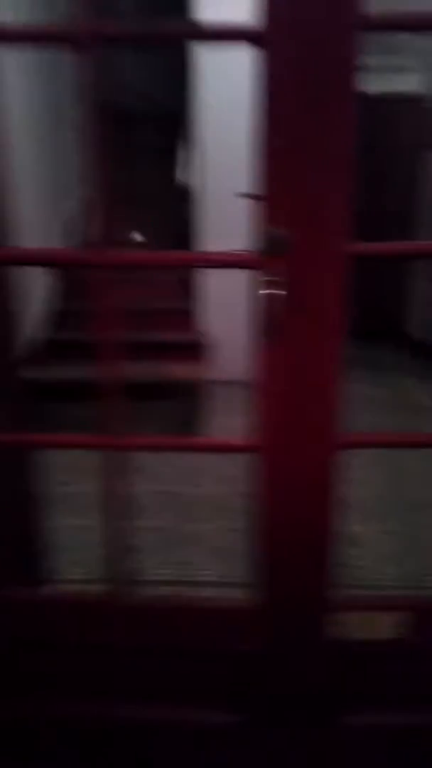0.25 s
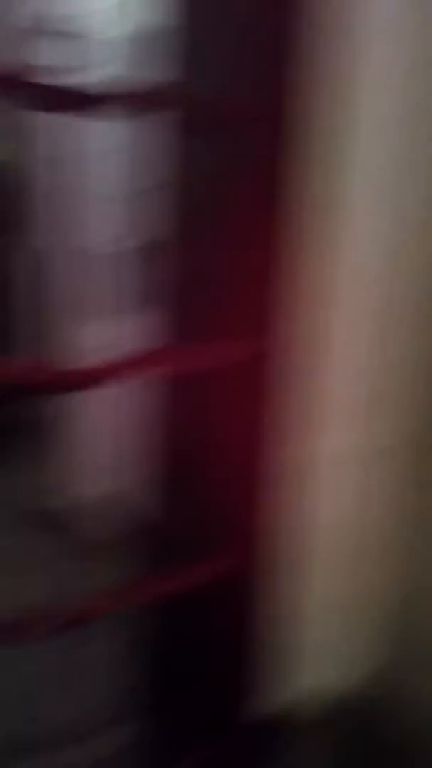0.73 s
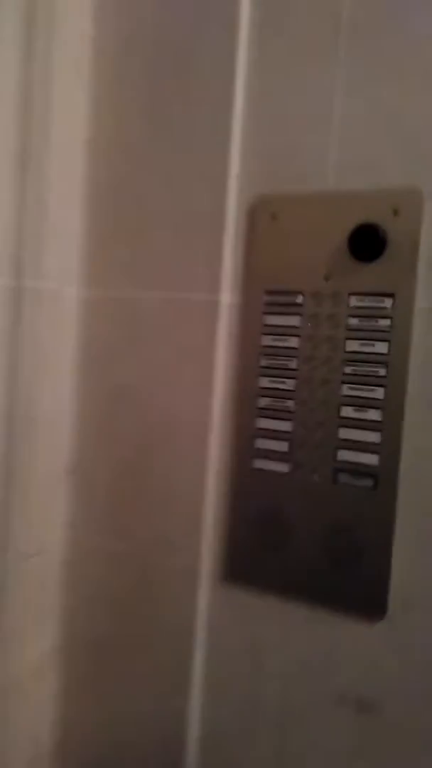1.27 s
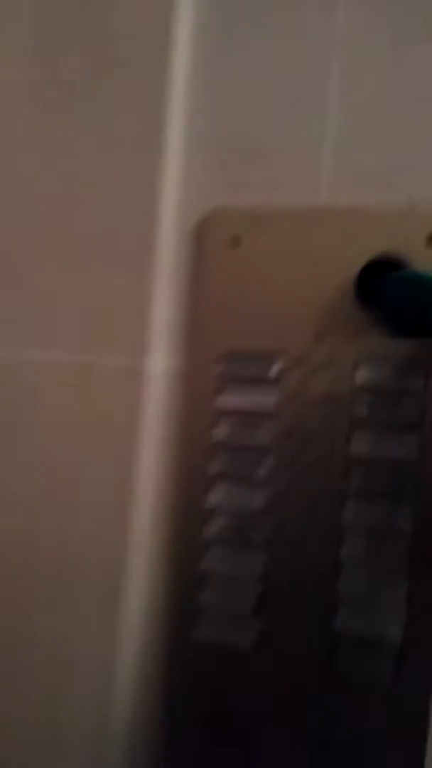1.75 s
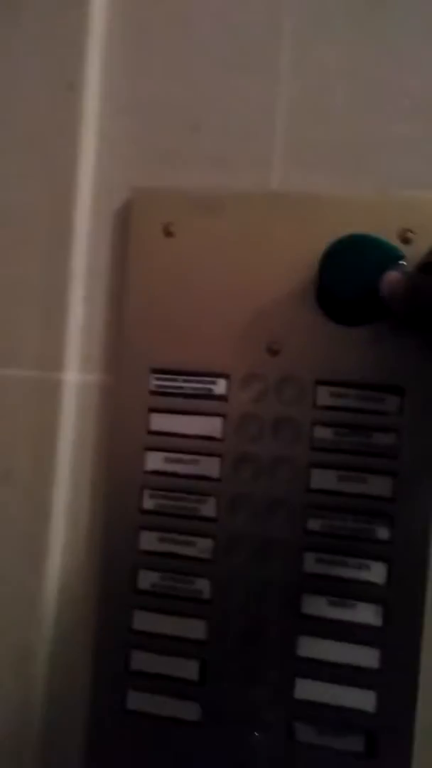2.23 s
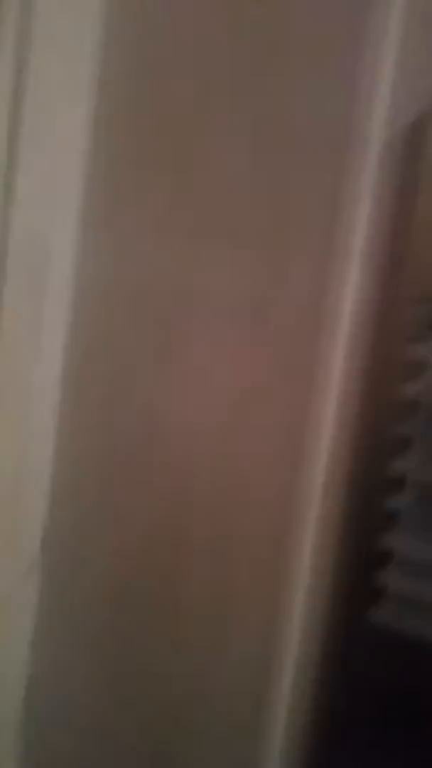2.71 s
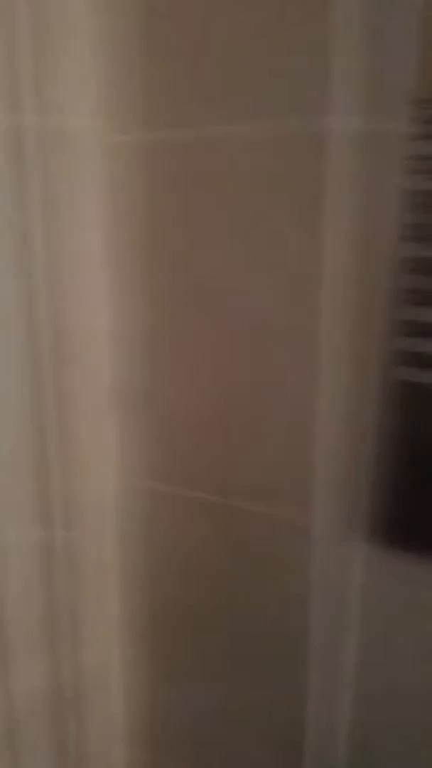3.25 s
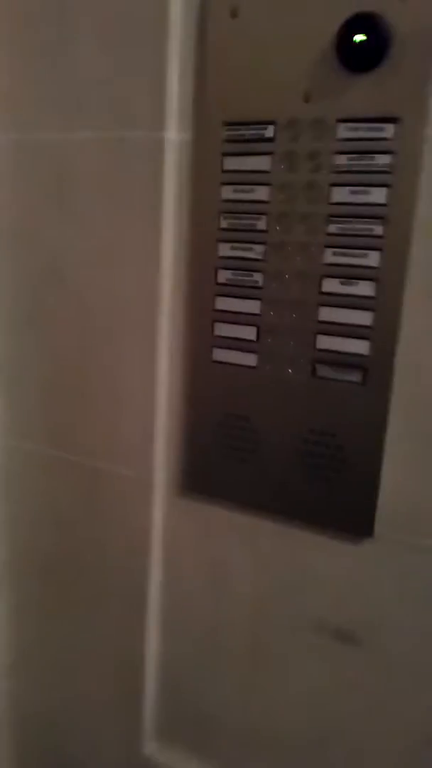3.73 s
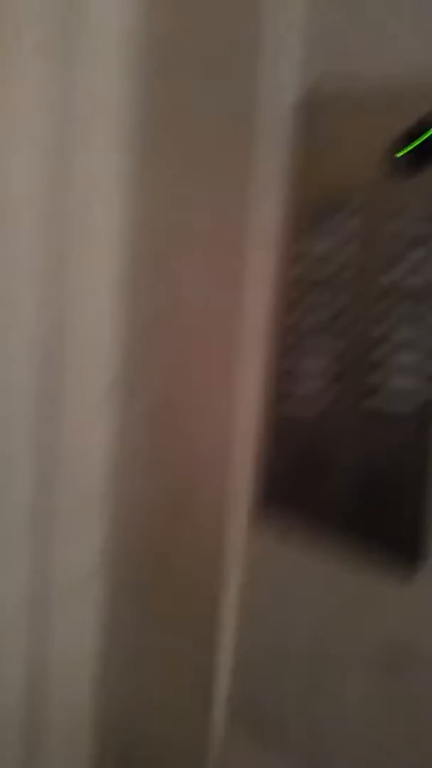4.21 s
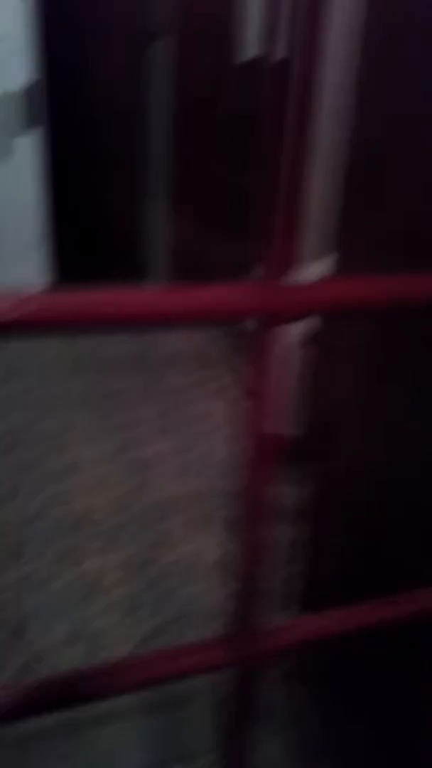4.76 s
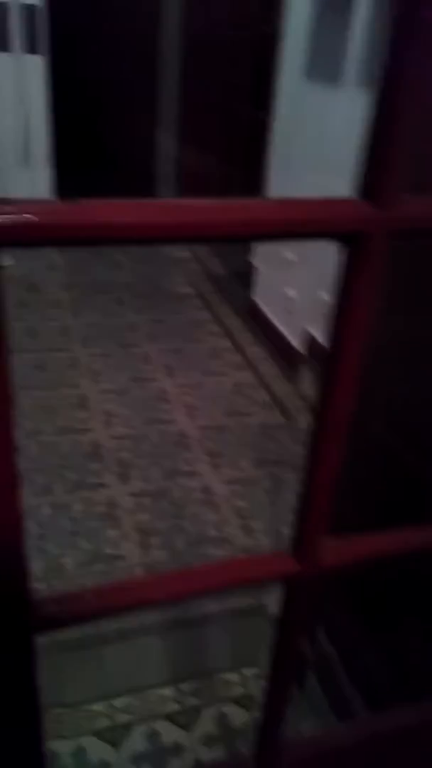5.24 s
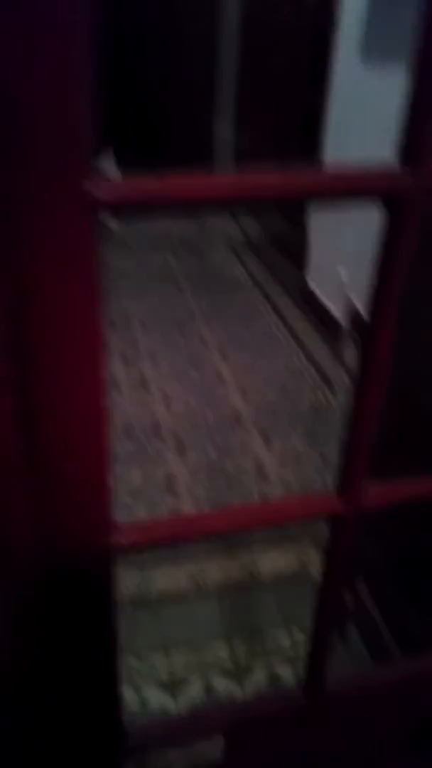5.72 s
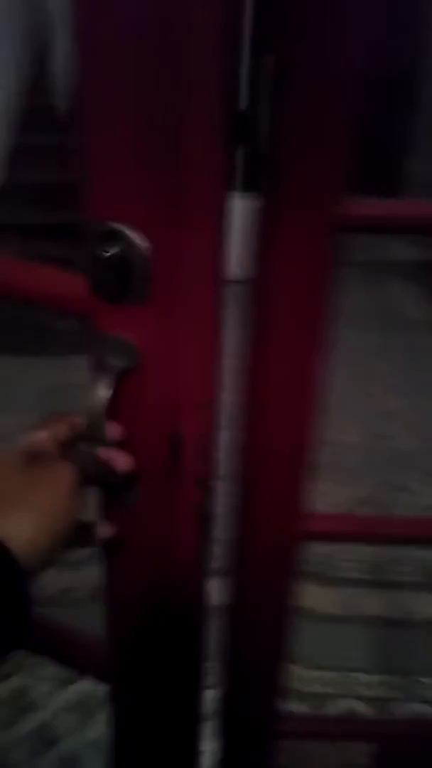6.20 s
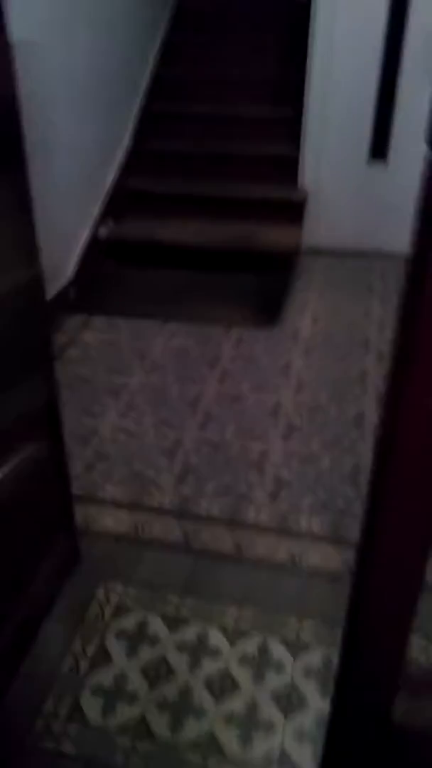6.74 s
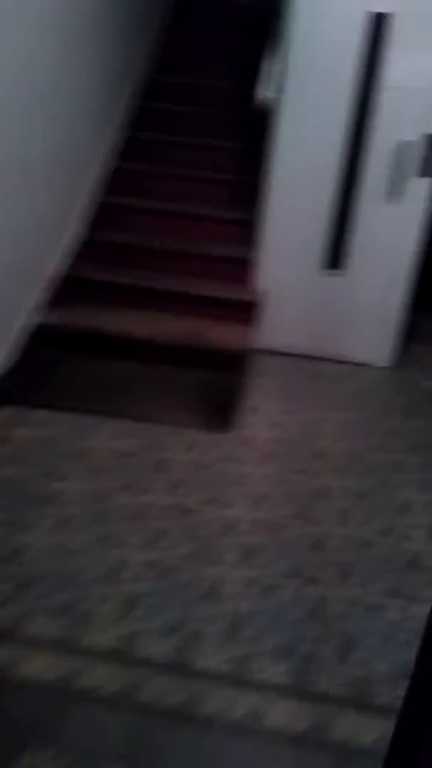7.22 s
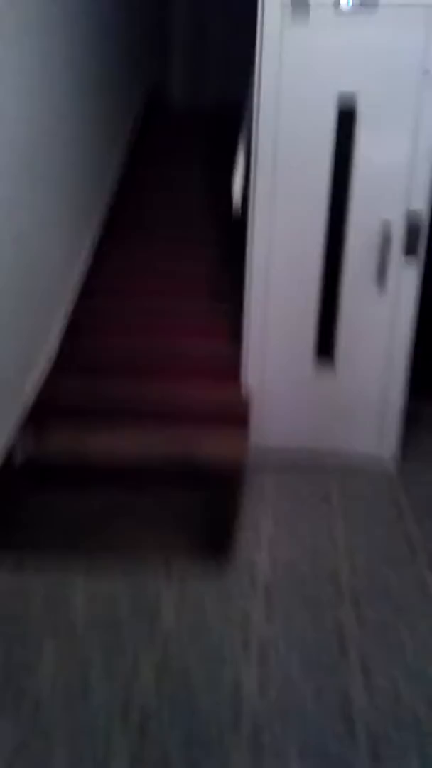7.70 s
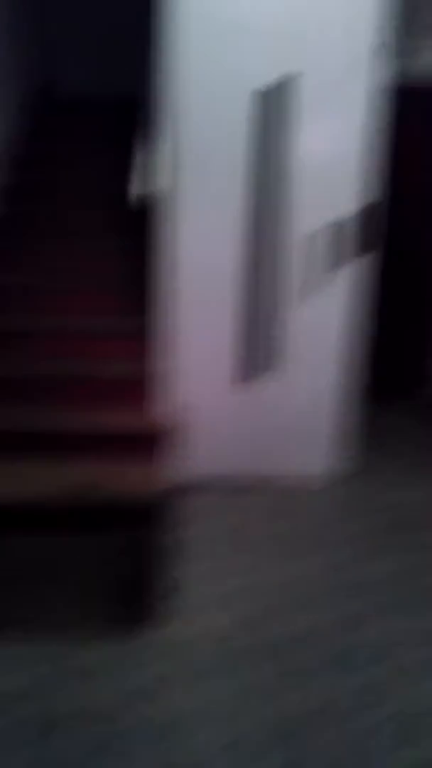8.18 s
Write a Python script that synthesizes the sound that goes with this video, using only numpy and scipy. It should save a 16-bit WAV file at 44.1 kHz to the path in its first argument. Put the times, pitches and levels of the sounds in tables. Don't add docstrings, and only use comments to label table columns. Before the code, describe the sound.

Key ticks, a lock knock and rough handling noise over fading traffic, then one huge, overloading door slam echoes and a latch clicks.

```python
import sys
import numpy as np
from scipy import signal
from scipy.fft import rfft, irfft, next_fast_len
from scipy.io import wavfile
from scipy.ndimage import uniform_filter1d

SR = 44100
rng = np.random.default_rng(int(sys.argv[2]) if len(sys.argv) > 2 else 0)


def wrap_up_sound(samples):
    columns = np.atleast_2d(samples).T
    tamed = np.clip(columns, -1, 1)
    steps = np.round(tamed * 32767).astype(np.int16)
    wavfile.write(sys.argv[1], SR, steps)


def field_ratio(decibels):
    return 10 ** (np.asarray(decibels, dtype=float) / 20)


N = 373086
TIME = np.arange(N) / SR
SIZE = next_fast_len(N + 2 * SR)
HZ = np.arange(SIZE // 2 + 1) * SR / SIZE + 1e-3

# [t/s, peak level/dB, left minus right/dB, hall share/dB]
DOOR_BLOWS = [
    (5.428, -11.5, 3.7, -4.5),
    (5.441, -20.5, 3.7, -5),
    (5.558, -8, 3.7, -2),
    (5.5645, 8, 2.2, -0.5),
    (5.570, -1, 2.2, -5.5),
]
HANDLE_BLOWS = [
    (5.359, -24, 2, -2.5),
    (5.364, -23, 1.85, -2),
    (5.383, -23.5, 3.8, -4),
    (5.396, -28.5, 3.8, -5),
    (5.4172, -17, 4.6, -7.5),
]
LATCH_BLOWS = [
    (7.0566, -13, 7.2, -0.5),
    (7.0605, -14, 7.2, -2.5),
]
BOLT_BLOWS = [
    (2.059, -20.5, 2.5, -6),
    (2.071, -2, 5.2, -6.5),
]
KEY_BLOWS = [(0.0403, -18.5, 22, -11), (0.0644, -21, 21, -18), (0.1072, -3.5, 21, -9.5),
             (0.157, -15, 17.5, -0.5), (0.4334, -16, 13.5, -11), (0.6065, -33, 9.5, -20),
             (0.6255, -16.5, 14, -16.5), (0.7038, -25, 14, -12), (2.4486, -33.5, 12.5, -5.5),
             (2.5441, -20.5, 7, -22.5), (2.566, -21, 15, -14.5), (2.5854, -24, 12.5, -11.5),
             (2.631, -13, 15.5, -8.5)]
# [f/Hz, level per Hz/dB]
DOOR_TONE = [(76, -33), (130, -13), (217, -9.5), (264, -21), (310, -9.5), (497, -7), (783, -6), (1550, 0.5),
             (2770, 4), (4530, -6), (6300, -7.5), (10400, -0.5), (14500, -18.5)]
HANDLE_TONE = [(120, -14.5), (560, -3.5), (900, -7), (1300, -0.5), (1700, -8), (2500, -5.5), (4500, -9.5),
               (10400, -7.5), (14500, -25.5)]
LATCH_TONE = [(180, -41.5), (300, -37), (383, -15), (465, -12.5), (807, -19), (1050, -7.5), (1450, -12),
              (2050, -3), (3050, -14), (6340, -13.5), (10100, -3.5), (14500, -10.5)]
BOLT_TONE = [(150, -49.5), (340, -9), (440, -7.5), (530, -3.5), (835, -20), (1210, -7.5), (1340, -16.5),
             (2700, -10), (4570, -27), (5410, -18), (7350, -24.5), (10100, -17.5), (14500, -40)]
KEY_TONE = [(1880, -54), (3200, -26.5), (4310, -12.5), (4770, -19.5), (5170, -11), (7000, -10), (9430, 2),
            (14500, -8.5)]
# [f/Hz,
# level/dB, t60/s]
DOOR_RING = [(310.4, -27.5, 0.94), (796.6, -29.5, 0.46), (879.4, -33, 0.4), (1029, -31.5, 0.41),
             (1304, -31.5, 1), (1696, -30.5, 0.54), (2235, -29.5, 0.55), (2644, -28, 0.61),
             (2990, -30.5, .5),
             (783, -29, 0.6), (924.4, -33, 0.44), (1277, -32.5, .6), (1391, -30.5, .7),
              (1574.6, -30.5, .8), (1982, -29.5, 0.52), (2070, -30, .55), (2381, -31, 0.77),
              (2529, -31, 0.76), (3102, -29.5, .55), (3360, -30.5, .5), (4133.3, -32.5, .45),
              (4270, -30.5, 0.49)]
HANDLE_RING = [(641, -31.5, .25), (1240, -25, .3), (1306, -14, .12), (2374, -27.5, .25)]
LATCH_RING = [(466, -38, 0.58), (900, -28, 0.37), (1110, -24.5, .3), (1938, -25, 0.51), (2000, -32, 0.48),
              (2083, -30, 0.58), (2520, -14.5, 0.053), (2730, -28, 0.66), (4270, -39, 0.33),
              (4830, -23.5, 0.061), (5470, -25.5, .06)]
BOLT_RING = [(361.3, -21.5, 0.28), (540, -20.5, 0.28), (1232, -17, 0.098), (1275, -22, 0.39),
             (1556, -25, .5), (2212, -33.5, .6), (2660, -24.5, .5), (2671, -22.5, 0.76), (2765, -21.5, .6),
             (2977, -40.5, 0.44), (5523, -6, 0.042), (5975, -28, .09)]
KEY_RING = [(4150, -24, 0.23), (4280, -27, 0.2), (9550, -30, .15), (9910, -26, .15)]
# [f/Hz, t60/s]
HALL_DECAY = [(100, 1), (260, 1.3), (700, 1.198), (1840, 1.0055), (4850, 0.764), (12800, 0.43)]
# [t/s, peak level/dB, f/Hz, left minus right/dB]
CHINKS = [(0.0534, -16, 8970, 17.5), (0.1174, -11.5, 9770, 7), (0.1644, -11, 9500, 10),
          (0.3955, -35, 11240, 10.5), (0.4334, -13.5, 6130, 12), (0.6164, -24.5, 9500, 9),
          (0.6324, -21.5, 9600, 12.5), (0.7104, -38, 8770, 8.5), (2.5474, -24, 9080, 4.0),
          (2.5656, -21, 9380, 3.5), (2.6095, -14.5, 8110, 12), (2.6304, -16.5, 7850, 12.5),
          (2.6359, -2.5, 9520, 18), (2.6434, -19, 9840, 13.0), (2.6693, -13.5, 10900, 15.5),
          (2.7434, -6.5, 11100, 25.5), (2.7594, -14, 11300, 14.5), (2.7801, -13, 8180, 16),
          (2.8014, -29.5, 8590, 13.5), (2.9567, -29, 8820, 12), (3.0779, -22.5, 8750, 18),
          (3.1502, -27.5, 10550, 19), (2.559, -24.5, 8170, 8), (2.683, -19, 9500, 15.5),
          (2.684, -15.5, 5820, 16.5), (2.979, -30.5, 7250, 19.5)]
# [start t/s, end t/s, first level/dB, last level/dB]
STROKES = [(2.446, 2.499, -43.5, -51), (2.545, 2.556, -32, -38.5), (2.558, 2.603, -37, -38.5),
           (2.609, 2.629, -23.5, -34), (2.634, 2.656, -13, -34.5), (2.677, 2.705, -26.5, -23.5),
           (2.703, 2.74, -24, -22.5), (2.732, 2.753, -17.5, -20), (2.756, 2.765, -18, -26.5),
           (2.779, 2.857, -30, -53.5), (2.97, 3.002, -41.5, -35.5), (3.002, 3.048, -23.5, -23.5),
           (3.049, 3.102, -30.5, -49.5), (3.152, 3.198, -32, -23.5), (3.194, 3.257, -23, -24),
           (3.251, 3.29, -21.5, -21.5), (3.289, 3.298, -27, -31.5), (3.3, 3.383, -36, -58),
           (3.383, 3.46, -40.5, -57.5), (3.471, 3.484, -33, -39), (3.517, 3.535, -33, -41),
           (3.547, 3.602, -40, -42), (3.591, 3.604, -41, -34), (3.602, 3.625, -33, -39),
           (3.727, 3.767, -34.5, -25), (3.764, 3.898, -25.5, -29.5), (3.892, 3.931, -35, -29.5),
           (3.929, 3.959, -30.5, -43.5), (3.96, 4.015, -29, -34.5), (4.011, 4.101, -39, -42),
           (4.104, 4.144, -53, -52.5), (4.148, 4.186, -46, -41.5), (4.17, 4.243, -37, -29),
           (4.242, 4.365, -29.5, -51.5), (4.358, 4.419, -22, -27.5), (4.417, 4.495, -29.5, -32.5),
           (4.499, 4.505, -40, -42.5), (4.51, 4.568, -32.5, -54)]
SLEEVE = [
    (1.369, 1.417, -44, -37),
    (1.415, 1.564, -35, -54),
]
# [t/s, half length/s, first f/Hz, last f/Hz, level/dB]
SQUEAK = (2.5, 0.026, 8401, 7299.5, -14)
# [f/Hz, width/Hz, level/dB]
LEFT_CAVITY = [(9915, 4400, 13.5), (7810, 1900, -2), (12960, 2000, -8.5)]
# [t/s, dull part level/dB, left minus right/dB]
GRIP = [(1.5, -34, 9.5), (2.55, -19.5, 1.5), (2.65, -36, 15), (2.72, -13.5, 39.5), (2.85, -10.5, 11),
        (3.03, -5.5, 44.5), (3.4, -14, 11.5), (3.8, -11.5, 57.5), (4.5, -19, 60)]
# [t/s, level/dB]
CLOTH = [(0, -57), (1.3, -57), (1.67, -60.5), (4.5, -68.5), (4.75, -80), (5.3, -68), (6.8, -72.5),
         (7.0, -59), (8.46, -65)]
# [t/s, half length/s, level/dB, dull part level/dB]
SWISHES = [(.3, 0.334, -57.5, -1), (1.92, 0.25, -87.5, -41), (2.06, 0.0537, -40.5, -18.5),
           (2.7, 0.118, -45, -21.5), (3.3, .35, -53.5, -11.5), (4.5, 0.177, -68, -12.5),
           (4.9, 0.086, -70, -27), (5.16, 0.101, -67, -29), (6.192, 0.0896, -57, -13.5),
           (6.52, 0.1692, -67, -15.5), (6.884, 0.0394, -55.5, -23), (7.521, 0.0746, -60, -7),
           (8.23, 0.073, -59, -13), (8.46, 0.16, -62.5, -12.5)]
# [t/s, peak level/dB, left minus right/dB]
TAPS = [(2.4694, -38.5, 25), (2.6095, -31.5, -4), (2.637, -15, 1.5), (2.6693, -18.5, 13.5),
        (2.6816, -22.5, 22), (2.7565, -23, 23), (2.7801, -20, 16), (2.8734, -30, 28), (2.9073, -41.5, 8.5),
        (2.9357, -42.5, 10), (2.9567, -39.5, 12), (2.992, -30.5, 28), (3.0172, -9.5, 49.5),
        (3.0779, -24.5, 15), (3.2604, -28, 30), (3.471, -35.5, 17), (3.5194, -32.5, 21.5), (4.09, -40, 21),
        (4.3465, -36.5, 23.5)]
KNOCKS = [
    (3.2565, 3.5, 46),
    (3.2595, -5.5, 42),
    (3.2622, -6.5, 41.5),
    (3.5039, -30, 16),
    (4.1322, -34, 25.5),
    (4.5126, -27, 20.5),
    (4.565, -44, 13),
]
# [t/s, peak level/dB, left minus
# right/dB, shell ring level/dB]
SNAPS = [(2.4026, -45.5, 1.5, -22.5), (3.5041, -19.5, 17, -16), (4.0900, -30, 25, -13.5),
         (4.1174, -43, 16, -23), (4.1323, -28.5, 21, -10.5), (4.1465, -37, 20.5, -19),
         (4.157, -39, 20.5, -18.5), (4.1657, -36, 24.5, -20), (4.1823, -34.5, 27, -23),
         (4.3461, -30, 25, -25.5), (4.3595, -21, 32, -22.5), (4.5126, -25.5, 20.5, -22.5),
         (3.3831, -36, 12.5, -26.5), (3.5478, -37.5, 19.5, -22.5), (5.4173, -14.5, 7.5, -23),
         (0.3655, -37.5, 12, -24.5), (0.3955, -32, 10, -23), (2.5654, -24, 2, -18),
         (2.6303, -15, 14.5, -24), (2.6825, -15, 14, -22.5), (2.8014, -29, 13, -22.5),
         (2.9364, -33, 9.5, -13.5), (2.9913, -24.5, 24.5, -20)]
# [t/s, peak level/dB, f/Hz]
BUFFETS_LEFT = [(2.989, -26, 120), (3.722, -49, 130), (3.79, -43, 152), (3.864, -36.5, 100),
                (3.926, -40, 100), (4.05, -36, 80), (4.089, -42.5, 111), (4.133, -34.5, 112),
                (4.165, -38, 99), (4.185, -38, 131), (4.346, -37.5, 90), (4.362, -36, 60.4),
                (4.456, -35, 121.7), (4.511, -32.5, 120.2), (4.566, -39, 432), (7.302, -25.5, 106.6),
                (7.33, -28.5, 66), (7.53, -34, 68.7), (7.505, -40, 59.8), (7.554, -27, 66),
                (7.578, -32, 62.5), (7.598, -37, 69.62), (7.63, -44.5, 60), (7.685, -38.5, 95),
                (7.702, -36, 54.5), (7.79, -43.5, 59.76), (7.83, -40, 60)]
BUFFETS_RIGHT = [(7.108, -27.5, 75), (7.189, -40, 62), (7.285, -38, 60), (7.225, -47.5, 65.4),
                 (7.355, -37.5, 50), (7.395, -33.5, 60), (7.45, -42.5, 54.8)]
# [t/s, level/dB]
ENGINE = [
    (.4, -75),
    (1.0, -45.5),
    (1.3, -29),
    (1.9, -33),
    (2.45, -23.5),
    (2.65, -29.5),
    (2.85, -38.5),
    (3.5, -42.5),
    (4.8, -50),
    (6.3, -73),
]
# [t/s, half length/s, rumble level/dB, low level/dB]
SWELLS = [(0.388, 0.067, -54, -50.5), (1.5, .5, -38.5, -78.5), (3.016, 0.096, -26, -47),
          (4.188, 0.66, -42, -51.5), (5.43, 0.058, -36.5, -48.5), (5.659, 0.21, -28.5, -32),
          (5.82, 0.13, -36.5, -41.5), (6.846, 0.135, -72, -73.5), (7.321, 0.055, -38, -62.5),
          (7.623, 0.282, -43.5, -52)]
# [t/s, level/dB]
ROAD = [(0, -43), (.35, -42.5), (.7, -41), (1.2, -42), (1.55, -45), (2, -45), (2.5, -46), (2.9, -47.5),
        (3.2, -48.5), (3.5, -53.5), (4, -56.5), (4.4, -59), (4.65, -64), (5.3, -64.5), (6.4, -67.5),
        (8.05, -69), (8.46, -65.5)]
# [f/Hz, level per Hz/dB]
TYRE_TONE = [(190, -27.5), (320, -1), (462, -6), (510, -7.5), (793, -4), (1100, -10), (1330, -7),
             (2640, -18.5), (3460, -31.5), (6000, -35), (7800, -64), (13200, -120)]
HOUSE_TONE = [(120, -48), (200, -15), (255, 0), (425, -26.5), (672, -28), (892, -16), (1110, -22),
              (5000, -32), (6500, -62), (11000, -120)]
# [t/s, level/dB]
WHINE = [
    (6, -80),
    (6.4, -64),
    (6.62, -58.5),
    (6.8, -76),
    (8.2, -75),
]
# [t/s, half length/s, f/Hz, level/dB]
NOISE_SWELLS = [(2.73, 0.0327, 2786, -36.5), (3.3, .006, 2600, -39.5), (0.262, 0.244, 2600, -46),
                (4, .08, 110, -44), (6.12, 0.094, 84.5, -49.5), (8.2, 0.083, 168, -58), (7.58, 0.105, 2730, -58),
                (8.13, 0.378, 2540, -65), (7.1, 0.084, 328, -47.5), (8.17, 0.027, 790, -57),
                (8.36, .03, 824, -55.5), (8.43, .04, 636, -55)]
# [f/Hz, left minus right/dB]
PORT_BALANCE = [(60, 1.73), (600, 3), (3000, 5.5), (7000, 2.5), (13000, 19)]


def shape(table):
    hz, db = np.transpose(table)
    outside = np.maximum(0, np.log2(np.maximum(hz[0] / HZ, HZ / hz[-1])))
    return field_ratio(np.interp(np.log(HZ), np.log(hz), db) - 18 * outside)


def peak(hz, width_hz):
    return 1 / (1 + 1j * (HZ - hz ** 2 / HZ) / width_hz)


def causal(gain):
    cepstrum = irfft(np.log(gain + 1e-6), SIZE)
    cepstrum[1:SIZE // 2] *= 2
    cepstrum[SIZE // 2 + 1:] = 0
    return np.exp(rfft(cepstrum))


def noise(gain, channels=2):
    re, im = rng.standard_normal((2, channels, len(HZ)))
    x = irfft((re + 1j * im) * gain, SIZE)[:, :N]
    return x / x.std()


def curve(rows):
    s, *columns = np.transpose(rows)
    return [np.interp(TIME, s, column) for column in columns]


def walk(rate_hz):
    hold = int(SR / rate_hz)
    levels = np.repeat(rng.standard_normal(N // hold + 1), hold)
    return 0.94 * uniform_filter1d(levels, hold)[:N]


def bell(s, half):
    return np.exp(-((TIME - s) / half) ** 2)


def swells(s, half, db):
    return sum(field_ratio(g) * bell(m, h) for m, h, g in zip(s, half, db))


def pan(db):
    return 2 / np.sqrt(1 + field_ratio(2 * np.array([[-db], [db]])))


def ports(pair):
    a, b = rfft(pair, SIZE)
    share = 1 / np.sqrt(1 + (HZ / 474) ** 3.4)
    hz, db = np.transpose(PORT_BALANCE)
    duller = field_ratio(-np.interp(np.log(HZ), np.log(hz), db))
    right = (np.sqrt(1 - share ** 2) * b - share * a) * duller
    return irfft(np.array([a, right]), SIZE)[:, :N]


def hall(stretch):
    hz, t60 = np.transpose(HALL_DECAY)
    t = TIME[:2 * SR]
    white, tail = rfft(rng.standard_normal((2, 2 * SR))), 0
    bins = np.arange(SR + 1) / 2 + 1e-3
    for centre in 60 * 2 ** np.arange(0, 8.1, .5):
        band = np.cos(np.pi / 2 * np.clip(2 * np.log2(bins / centre), -1, 1)) ** 2
        decay = stretch * np.interp(np.log(centre), np.log(hz), t60)
        patchy = field_ratio(2.2 * walk(45)[:2 * SR])
        tail = tail + patchy * irfft(white * band) * np.exp(-np.log(1000) * t / decay)
    return tail


def blows(rows, tone, ring, stretch, crack_ms, boost_db, thin_hz):
    t = TIME[:2 * SR]
    colour = causal(shape(tone))
    colour = colour / np.sqrt(np.mean(abs(colour) ** 2))
    rings = 0
    for hz, db, t60 in ring:
        mode = np.sin(2 * np.pi * (hz * t + rng.random((2, 1))))
        rings = rings + field_ratio(db + 12) * mode * np.exp(-np.log(1000) * t / t60)
    walls = hall(stretch) * (1 - np.exp(-t / 0.0035))
    near, far, grit = np.zeros((2, N)), np.zeros(N), rng.standard_normal((2, N))
    crack = np.exp(-t[:2000] * 1e3 / crack_ms)
    for s, db, pan_db, hall_db in rows:
        span = slice(int(s * SR), int(s * SR) + 2000)
        level_db = db - 11.0 + boost_db
        near[:, span] += field_ratio(level_db) * pan(pan_db) * grit[:, span] * crack
        far[span.start] += field_ratio(level_db + hall_db)
    thin = 1 / (1 + thin_hz / (1j * HZ)) ** 2
    direct = irfft(rfft(near, SIZE) * colour * thin, SIZE)[:, :N]
    room = rfft(walls, SIZE) * colour + rfft(rings, SIZE)
    answer = irfft(rfft(far, SIZE) * room, SIZE)[:, :N]
    return direct + ports(answer)


def panels(count, low_hz=1450, high_hz=5200, ring_db=-40, t60=.45):
    place, size, life = rng.random((count, 3)).T
    hz = low_hz * (high_hz / low_hz) ** place
    return list(zip(hz, ring_db + 8 * (size - .5), t60 * (.5 + life)))


def door():
    ring = DOOR_RING + panels(count=45)
    slam = blows(DOOR_BLOWS, DOOR_TONE, ring, stretch=0.9274, crack_ms=5.5, boost_db=4.5, thin_hz=500)
    handle = blows(HANDLE_BLOWS, HANDLE_TONE, HANDLE_RING, stretch=0.972, crack_ms=5.3, boost_db=3.0,
                   thin_hz=399.8)
    return slam + handle


def latch():
    return blows(LATCH_BLOWS, LATCH_TONE, LATCH_RING, stretch=0.808, crack_ms=5.1, boost_db=-0.5, thin_hz=799.3)


def bolt():
    return blows(BOLT_BLOWS, BOLT_TONE, BOLT_RING, stretch=0.88, crack_ms=3.9, boost_db=1.9, thin_hz=1096)


def keys():
    ticks = blows(KEY_BLOWS, KEY_TONE, KEY_RING, stretch=0.913, crack_ms=1.8, boost_db=4.0, thin_hz=896.7)
    return ticks + chinks()


def chinks():
    out, t = np.zeros((2, N)), TIME[:2500]
    swell, fade = 1 - np.exp(-t / 0.00065), np.exp(-t / 0.00197)
    for (s, db, hz, pan_db), turn in zip(CHINKS, rng.random((len(CHINKS), 3))):
        pair = np.sin(2 * np.pi * (hz * t + turn[0]))
        pair += 0.65 * np.sin(2 * np.pi * (hz * 1.07 * t + turn[1]))
        ring = np.sin(2 * np.pi * (4186 * t + turn[2])) * np.exp(-t / 0.008)
        ring *= field_ratio(-27 + 12.4 * (turn[1] - .5))
        start = int(s * SR)
        out[:, start:start + len(t)] += field_ratio(db - 5) * pan(pan_db) * swell * (pair * fade + ring)
    return out


def friction(left_db, dull_db, pan_db):
    left = noise(sum(field_ratio(g) * peak(f, w) ** 2 for f, w, g in LEFT_CAVITY), channels=1)
    right = noise(peak(7100, 5000) ** 2, channels=1)
    dull = field_ratio(dull_db) * noise(peak(4200, 3200) ** 2 / (1 + (3100 / HZ) ** 8))
    return field_ratio(np.array([left_db, left_db - pan_db])) * (np.vstack([left, right]) + dull)


def rub():
    db, (dull_db, pan_db) = np.full(N, -120.), curve(GRIP)
    for start, end, first_db, last_db in STROKES + SLEEVE:
        span = slice(int(start * SR), int(end * SR))
        db[span] = np.linspace(first_db, last_db, span.stop - span.start)
    grip_db = 20 * np.log10(uniform_filter1d(field_ratio(db), 90) + 1e-9)
    jerks_db = 2.2 * walk(500) + 1.1 * walk(65)
    return friction(grip_db + jerks_db, dull_db, pan_db)


def squeak():
    s, half, first_hz, last_hz, db = SQUEAK
    hz = np.interp(TIME, [s - half, s + half], [first_hz, last_hz])
    glide = np.cos(2 * np.pi * np.cumsum(hz) / SR)
    rough = noise(1 / (1 + (HZ / 900) ** 2), channels=1)[0]
    left = field_ratio(db) * np.exp(-((TIME - s) / half) ** 4) * glide * rough
    return np.array([left, np.zeros(N)])


def cloth():
    s, half, swish_db, part_db = np.transpose(SWISHES)
    rest = field_ratio(curve(CLOTH)[0])
    level = rest + swells(s, half, swish_db)
    dull = rest * field_ratio(-18.5) + swells(s, half, swish_db + part_db)
    level_db, dull_db = 20 * np.log10(level), 20 * np.log10(dull / level)
    return friction(level_db + 7.5 + 1.1 * walk(28), dull_db, pan_db=11.5)


def taps(rows, ms, body_db):
    crackle = noise(peak(11000, 7000) * peak(6600, 9800) / (1 + (3000 / HZ) ** 6))
    body = noise(peak(1500, 2600) + field_ratio(8.0) * peak(3600, 700))
    mix = crackle + field_ratio(body_db) * body
    out, t = np.zeros((2, N)), TIME[:1500]
    fade = np.exp(-t * 1e3 / ms) + field_ratio(-13.5) * np.exp(-t / 0.0027)
    for s, db, pan_db in rows:
        span = slice(int(s * SR), int(s * SR) + len(t))
        out[:, span] += field_ratio(db - 0.5) * pan(pan_db) * fade * mix[:, span]
    return out


def snaps():
    out, t = np.zeros((2, N)), TIME[:1200]
    rise = t * 1e3 / 0.09
    click = np.sin(2 * np.pi * 9500 * t) * rise * np.exp(1 - rise)
    sag = 0.275 * 0.001555 * (1 - np.exp(-t / 0.00146))
    shell = np.sin(2 * np.pi * 3978 * (t + sag)) * np.exp(-t / 0.00348)
    for s, db, pan_db, ring_db in SNAPS:
        start = int(s * SR)
        out[:, start:start + len(t)] += field_ratio(db + 3) * pan(pan_db) * (click + field_ratio(ring_db) * shell)
    return out


def fingers():
    touches = taps(TAPS, ms=1.6, body_db=-38) + taps(KNOCKS, ms=0.7, body_db=-14.5)
    return rub() + squeak() + cloth() + touches + snaps()


def buffets(rows, pan_db):
    out, t = np.zeros((2, N)), TIME[:3000]
    for s, db, hz in rows:
        cycles = hz * t
        push = np.sin(2 * np.pi * cycles) * cycles ** 1.19 * np.exp(1 - 2.556 * cycles)
        start = int(s * SR)
        out[:, start:start + len(t)] += field_ratio(db + 6.0) * pan(pan_db) * push
    return out


def draughts():
    shelter_db = 25.5
    return buffets(BUFFETS_LEFT, shelter_db) + buffets(BUFFETS_RIGHT, -shelter_db)


def traffic():
    road_db = curve(ROAD)[0]
    fading_db = road_db - ROAD[0][1]
    s, half, rumble_db, low_db = np.transpose(SWELLS)
    firing_hz = 81.5
    firing = np.sin(2 * np.pi * np.cumsum(firing_hz * (1 + 0.02 * walk(1.4))) / SR)
    drone_level = field_ratio(curve(ENGINE)[0] + 1.5 * walk(10.0))
    drone = drone_level * (firing + 0.95 * noise(peak(firing_hz, 25) ** 2))
    second_car = field_ratio(-38.0) * bell(.45, 0.196) * noise(peak(153.7, 13.7) ** 2)
    rumble_level = field_ratio(-38.5 + 0.53 * fading_db) + swells(s, half, rumble_db)
    rumble = field_ratio(-0.5) * rumble_level * noise(peak(48, 24) ** 2)
    low_level = field_ratio(-44 + 0.67 * fading_db) + swells(s, half, low_db)
    low = field_ratio(2.8 * walk(4.4)) * low_level * noise(peak(170, 130) * peak(150, 310))
    tyres = field_ratio(road_db + 7.0 + 1.6 * walk(9.1)) * noise(shape(TYRE_TONE))
    return drone + second_car + rumble + low + tyres


def house():
    hum = field_ratio(-63) * noise(shape(HOUSE_TONE))
    hum += field_ratio(-71.0) * noise(peak(260, 13) ** 2) + field_ratio(-59.5) * noise(peak(55, 50))
    for s, half, hz, db in NOISE_SWELLS:
        hum += field_ratio(db) * bell(s, half) * noise(peak(hz, 0.39 * hz) ** 2)
    return hum


def door_closer():
    whine = field_ratio(curve(WHINE)[0] + 3.1 * walk(4.5)) * noise(peak(2820, 190) ** 2)
    groan = noise(peak(790, 60) ** 2 + 0.55 * peak(1400, 120) ** 2)
    return whine + field_ratio(-65) * bell(6.75, .35) * groan


def scene():
    struck = door() + latch() + bolt() + keys()
    background = ports(traffic() + house() + door_closer())
    return struck + fingers() + draughts() + background


def roll_off(x):
    return signal.sosfilt(signal.butter(12, 14450, fs=SR, output="sos"), x)


def record(dry):
    soft = signal.sosfilt(signal.ellip(8, .3, 60, 14150, fs=SR, output="sos"), dry)
    soft = signal.sosfilt(signal.butter(2, 33, "high", fs=SR, output="sos"), soft)
    return roll_off(np.clip(soft, -1, 1))


dry = scene()
out = record(dry)
wrap_up_sound(out)
```